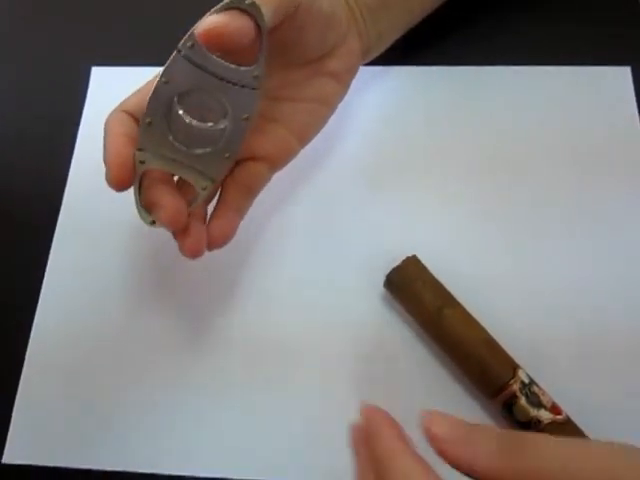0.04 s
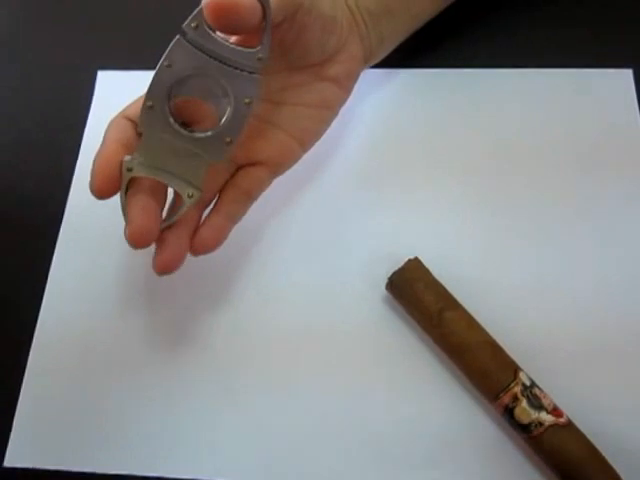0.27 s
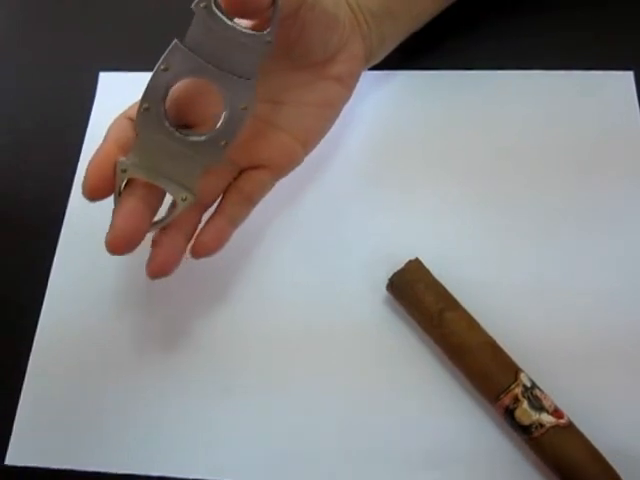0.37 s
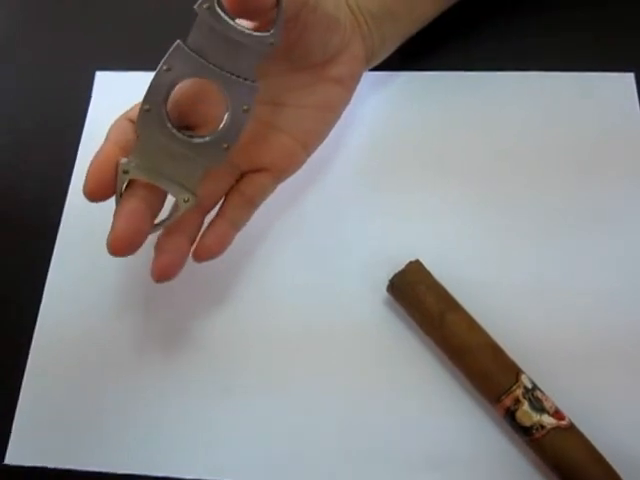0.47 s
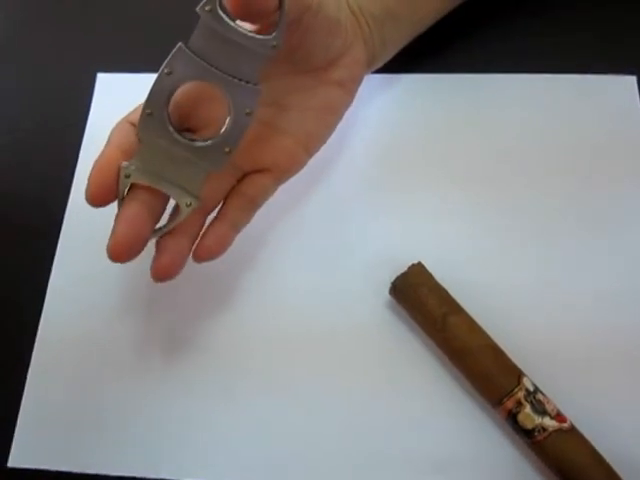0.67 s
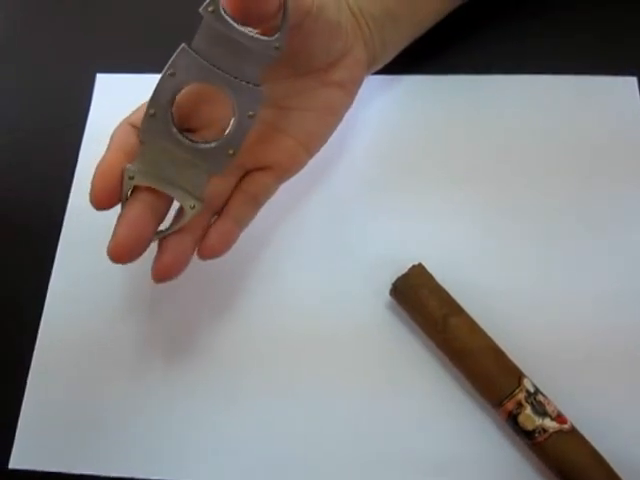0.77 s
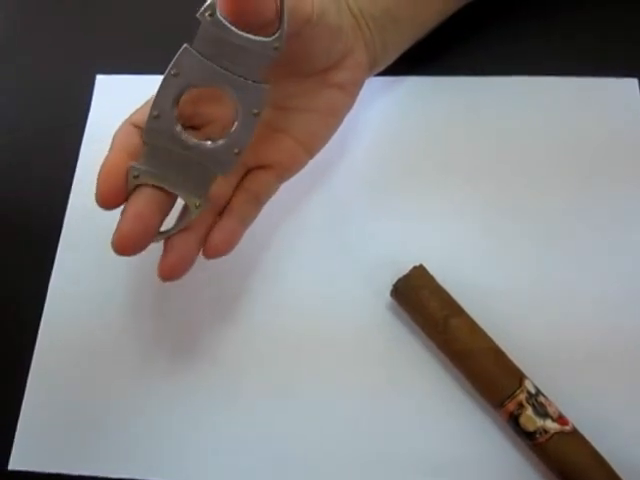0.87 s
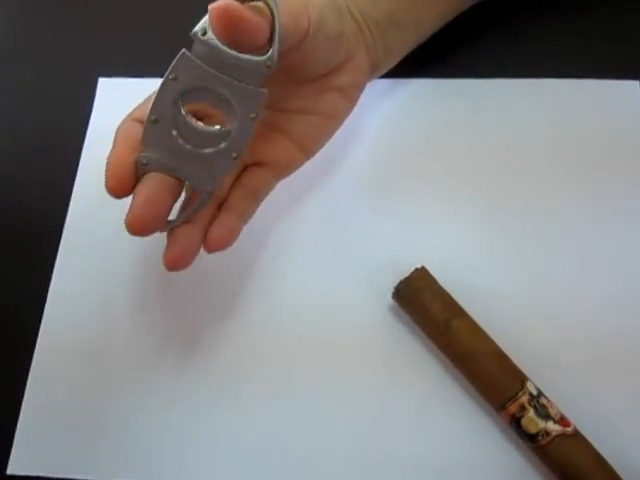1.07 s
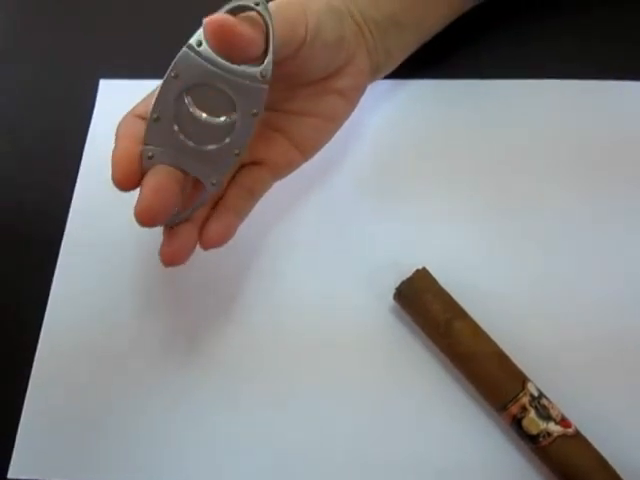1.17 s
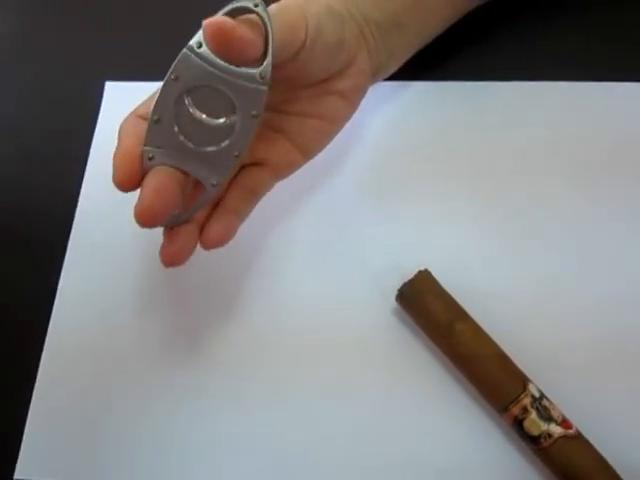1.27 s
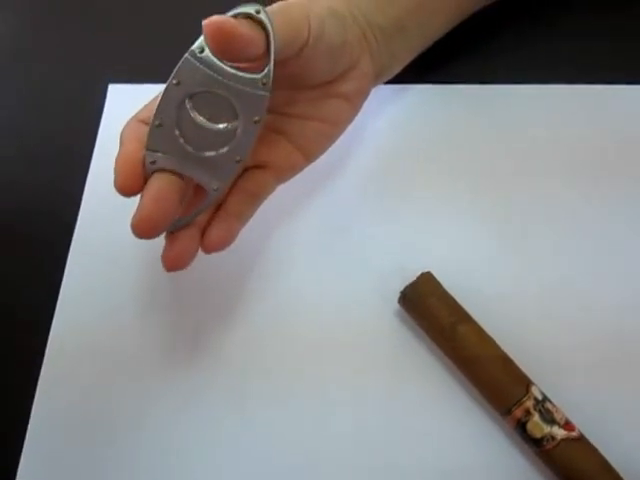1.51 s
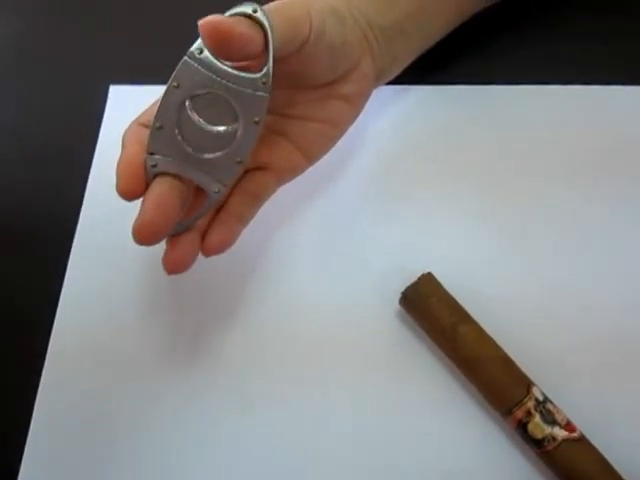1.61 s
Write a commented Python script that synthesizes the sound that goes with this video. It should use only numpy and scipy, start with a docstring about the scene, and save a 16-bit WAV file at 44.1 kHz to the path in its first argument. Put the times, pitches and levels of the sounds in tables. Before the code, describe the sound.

A steel cigar cutter, worked in one hand, opens with two sharp rattling clicks, the second louder. After a short pause its blades scrape softly back and click shut. Heard close up in a quiet room.

```python
"""A stainless steel cigar cutter is worked in one hand in a quiet room. First its two blades slide out and
rattle against their stops, at about 0.25 s and 0.45 s, with soft low thuds among them. From 0.9 s they scrape
back in short slips, and near 1.25 s they click shut. Rumble, hum and hiss lie under it all; an automatic gain
control turns everything down for a moment after a loud click."""
import sys
import numpy as np
from scipy import signal
from scipy.fft import rfft, irfft, next_fast_len
from scipy.io import wavfile
from scipy.ndimage import uniform_filter1d

SR = 44100
rng = np.random.default_rng(int(sys.argv[2]) if len(sys.argv) > 2 else 0)


def wrap_up_sound(samples):
    """Save the sound to the file named by the first command line argument, as 16-bit audio."""
    columns = np.atleast_2d(samples).T
    # keep every value between -1 and 1, then stretch to whole-number steps
    tamed = np.clip(columns, -1, 1)
    steps = np.round(tamed * 32767).astype(np.int16)
    wavfile.write(sys.argv[1], SR, steps)


N = 72765
T = np.arange(N) / SR
RING_WIDTH_HZ = 210   # width of the pitch band that a hit or slip brings out


def clicks(node_width_hz=640, node_db=-13):
    """A blade hits its stop: it chatters, sets the steel ringing and echoes in the room."""
    # One row per hit. The node is a pitch that stays weak, as it barely moves at the spot struck.
    # start_s, level_db, decay_s, low_edge_hz, low_db, mid_db, top_db, ring_hz, ring_db, node_hz, knock_db
    hits = [(0.2244, -19.5, .0022, 2570, -4.5, -2.5, -15, 10120, 13.5, 7600, -28),
            (0.2500, -13, 0.0014, 2480, -7.5, -9, -1.5, 2455, 18.5, 11100, -24.5),
            (0.2516, -8.5, 0.0012, 2430, -19, -13.5, -10, 4300, 12, 10900, -28.5),
            (0.2541, -16.5, 0.0016, 2460, -8, -1.5, -5, 9830, 8.5, 3550, -24),
            (0.4378, -11, 0.001, 2654, -12, 10, -9, 11180, 13.5, 7700, -24.5),
            (0.4541, -11, 0.0012, 2716, -5, -7, -0.5, 3760, 10.5, 9010, -22),
            (0.4549, -17, 0.0013, 2750, -3, 2, -0.5, 11200, 5, 7600, -22.5),
            (0.4575, -15, 0.0036, 2750, 0, 3, -4, 4890, 3, 9000, -22),
            (0.4602, -4, 0.00096, 2700, 3, 4.5, -3.5, 3050, 7, 7600, -21),
            (0.461, -1.5, .0014, 2760, -5.5, -2, -4, 6040, 15.5, 13600, -25),
            (1.2357, -12, 0.0013, 2650, 0.5, 1, -3, 7360, 14.5, 6350, -18.5),
            (1.2368, -16.5, 0.0021, 2350, -7.5, -6, -18, 3390, 7.5, 3950, -22.5),
            (1.2858, -16.5, 0.0013, 2400, 4.5, -0.5, 3.5, 3130, 6.5, 4100, -19.5),
            (1.2870, -10, 0.0009, 2480, -6, -6, -3.5, 5140, 6.5, 4090, -23),
            (1.2878, -11, 0.00084, 2340, -3.5, -12, 3, 14080, 6, 6000, -35)]
    out = np.zeros(N)
    for start_s, level_db, decay_s, low_edge_hz, *colour_db, ring_hz, ring_db, node_hz, knock_db in hits:
        rings = [(ring_hz, RING_WIDTH_HZ, ring_db), (node_hz, node_width_hz, node_db)]
        hit = signal.fftconvolve(chatter(decay_s), steel(low_edge_hz, colour_db, rings, knock_db))
        hit = hit * np.sqrt(decay_s * SR / np.sum(hit ** 2))   # longer chatter carries more energy
        sound = np.pad(hit, (0, N - len(hit))) + room(hit) + blade_ring(ring_hz)
        start = int(start_s * SR)
        out[start:] += from_db(level_db) * sound[:N - start]
    return out


def chatter(decay_s, size=1024, passes=4):
    """One hard contact and a dying buzz of small ones, about equally strong at all pitches."""
    fade = np.exp(-T[:size] / decay_s)
    force = rng.standard_normal(size) * fade
    force[0] = from_db(8.5)   # the first contact stands out
    for _ in range(passes):
        spectrum = rfft(force, 2 * size)
        flattened = irfft(spectrum / (np.abs(spectrum) + 1e-9))[:size]
        force = flattened * fade ** (1 / passes ** 2)
    return force


def steel(low_edge_hz, colour_db, rings, knock_db, size=2048):
    """The cutter's short ring after one contact, coloured by where it is touched; energy 1."""
    # Resonances of the steel, damped by the hand, and the dips between: pitch_hz, width_hz, gain_db
    resonances = [(2880, 580, 2.5), (3640, 260, -3), (4550, 220, 2), (6150, 500, 4), (7350, 700, -2.5),
                  (9900, 250, 4.5), (10470, 320, 7), (11000, 350, 5), (11874, 500, 10.5), (12370, 500, 4.5),
                  (13560, 570, 7.5)]
    # The low, mid and top bands that colour_db turns up or down: pitch_hz, sharpness
    bands = [(2940, 1.4), (6040, 0.79), (14000, 3.5)]
    colour = [(hz, hz / sharpness, db) for (hz, sharpness), db in zip(bands, colour_db)]
    tap = signal.unit_impulse(size)
    knock = from_db(knock_db) * cut(tap, 2300, "low")
    body = cut(tap, low_edge_hz, "high", order=8) + knock
    for pitch_hz, width_hz, gain_db in resonances + colour + rings:
        body = body + (from_db(gain_db) - 1) * resonance(body, pitch_hz, width_hz)
    body = cut(body, 14300, "low", order=4)   # the contact softens the highest pitches
    return body / np.sqrt(np.sum(body ** 2))


def blade_ring(ring_hz, boost_db=19.5):
    """A few faint tones escape the hand's damping and sing on, most of all those near ring_hz."""
    # Lasting tones of the blades: pitch_hz, level_db (relative to the hit), fade_s (to fall 60 dB)
    tones = [(4230, -57, .45), (6100, -70, .42), (9700, -62, 0.46), (10130, -55, .5), (10300, -49, .45),
             (14100, -60, .42)]
    out = np.zeros(N)
    for pitch_hz, level_db, fade_s in tones:
        nearness = np.exp(-((pitch_hz - ring_hz) / RING_WIDTH_HZ) ** 2)
        out += from_db(level_db + boost_db * nearness) * fade_out(fade_s) * sine(pitch_hz)
    return out


def scrapes(edge_s=0.0064, mid_db=3, size=4096):
    """The blades stick and slip in their guides; each slip rubs tiny contacts into the steel."""
    # One row per slip: start_s, length_s, level_db, swell_db, low_db, top_db, ring_hz, ring_db
    slips = [(0.127, 0.042, -56.5, 7.5, 3, -5.5, 11700, 2.5),
             (0.207, 0.037, -36.5, 1.5, -3.5, -1, 6830, 12.5), (0.241, 0.012, -26, 8.5, -5, 2, 13900, 7.5),
             (0.439, 0.0093, -28, -7.5, -12, 1.5, 6100, 2.5),
             (0.449, 0.0099, -20.5, 12, -17.5, 0, 11100, 6.5), (0.891, 0.024, -50, 3, -9, -10, 10150, 7),
             (0.923, 0.022, -53.5, 2.5, -11, -11, 10340, 2), (0.947, 0.0053, -36.5, 5, -9, -13, 3330, 17),
             (0.957, 0.0066, -43, -3, -4.5, -14, 3320, 7.5), (0.983, .018, -44.5, 2, 0, -10.5, 2250, 5.5),
             (1.014, 0.008, -44.5, 4, -4.5, -13.5, 2700, 6),
             (1.022, 0.024, -42.5, -3.5, -3, -12, 2690, 9.5),
             (1.047, 0.017, -39.5, -2.5, -5.5, -13, 2620, 10.5),
             (1.076, 0.012, -49.5, 1, -4.5, -5, 11000, 10.5), (1.105, .016, -39, -1, -2.5, 0, 2300, 5.5),
             (1.15, 0.012, -47, 6.5, 0, 3.5, 4360, 8), (1.161, .011, -37, -4, 0, -10, 4310, 6.5),
             (1.184, .010, -41, 1.5, -4.5, -2, 8550, 13), (1.225, 0.0091, -35, 6, -3, -8.5, 5430, 12.5),
             (1.269, 0.014, -40, 12, 0, -6, 2600, 11)]
    # Pitches that rubbing makes stronger or weaker: pitch_hz, width_hz, gain_db
    rub_colour = [(2630, 290, 5), (3650, 300, -5.5), (9900, 300, 3.5), (10650, 300, 3.5),
                  (12050, 780, -10.5)]
    out, grit, t = np.zeros(N), grains(), T[:size] - edge_s
    for start_s, length_s, level_db, swell_db, low_db, top_db, ring_hz, ring_db in slips:
        soft_edges = np.clip(np.minimum(t, length_s - t) / edge_s + .5, 0, 1)
        progress = np.clip(t / length_s, 0, 1)
        pressure = soft_edges ** 2 * from_db(level_db + swell_db * (progress - .5))
        rings = rub_colour + [(ring_hz, RING_WIDTH_HZ, ring_db)]
        body = steel(low_edge_hz=2196, colour_db=(low_db, mid_db, top_db), rings=rings, knock_db=-20)
        start = int((start_s - edge_s) * SR)
        rub = signal.fftconvolve(grit[start:start + size] * pressure, body)
        gain = np.sqrt(np.sum(pressure ** 2) / (np.sum(rub ** 2) + 1e-20))   # pressure sets loudness
        out[start:start + len(rub)] += gain * rub
    return out


def grains(per_s=7000, spread_db=3.5):
    """Dense tiny contacts of steel on steel, of uneven size; power 1."""
    sizes = from_db(spread_db * np.minimum(rng.exponential(1, N), 4))
    signs = rng.choice([-1, 1], N)
    touching = rng.random(N) < per_s / SR
    return rms_one(sizes * signs * touching)


def low_thuds(swell_s=0.02):
    """Soft, dull low thuds that swell and fade."""
    # One row per thud: peak_s, pitch_hz, level_db
    thuds = [(0.185, 160.5, -49), (0.245, 150, -47), (0.432, 42.1, -46.5)]
    return sum(from_db(level_db) * np.exp(-((T - peak_s) / swell_s) ** 2) * sine(pitch_hz)
               for peak_s, pitch_hz, level_db in thuds)


def room(x, fade_s=0.41, top_fade_s=0.35, split_hz=11500, early_db=-16, early_s=0.016, onset_s=0.0025):
    """Quick echoes from the table, then a wash of room echo whose highest pitches die sooner."""
    # Tone colour of the room's echo: pitch_hz, level_db
    echo_colour = [(1000, -25), (2500, -22), (3300, -21), (4300, -17.5), (5000, -15), (6100, -18),
                   (7500, -16), (9500, -17.5), (10350, -16.5), (11200, -25), (13000, -25), (14200, -19.5),
                   (15500, -19.5)]
    wash = noise(echo_colour)
    low = cut(wash, split_hz, "low", order=4) * fade_out(fade_s)
    high = cut(wash, split_hz, "high", order=4) * fade_out(top_fade_s)
    tail = (low + high) * np.sqrt(2 * np.log(1000) / (fade_s * SR))   # length does not add energy
    early = rng.standard_normal(N) * np.exp(-T / early_s)
    early *= from_db(early_db) * np.sqrt(2 / (early_s * SR))
    echo = (tail + early) * np.clip(T / onset_s, 0, 1)
    return signal.fftconvolve(x, echo)[:N]


def hum(waver_hz=3):
    """A faint hum in the room: each tone is a very narrow band of noise, so it wavers."""
    # Tones of the hum: pitch_hz, level_db
    tones = [(29, -60), (96, -62.5), (176, -60), (262, -61.5)]
    out, hz = np.zeros(N), np.fft.rfftfreq(N, 1 / SR)
    for pitch_hz, level_db in tones:
        band = np.exp(-.5 * ((hz - pitch_hz) / waver_hz) ** 2)
        tone = irfft(rfft(rng.standard_normal(N)) * band, N)
        out += from_db(level_db) * rms_one(tone)
    return out


def rumble(level_db=-47):
    """The room's low rumble, slowly getting quieter."""
    # Tone colour of the rumble: pitch_hz, relative_db
    colour = [(12, -29), (20, -2), (55, 0.5), (79, -10.5), (120, -2), (219, -1), (370, -5.5), (399, -2),
              (627, -13.5), (743, -13.5), (1800, -21.5), (2340, -52.5), (3960, -120)]
    # How its level drifts: time_s, change_db
    drift = [(0, 0), (0.43, 0.5), (0.6, -1.5), (0.9, -2), (1.25, -3.5), (1.65, -4)]
    return drifting_noise(colour, drift, level_db)


def hiss(level_db=-59.5):
    """A faint hiss, slowly getting quieter."""
    # Tone colour of the hiss: pitch_hz, relative_db
    colour = [(1000, -14.5), (2000, 3.5), (4000, -1), (8000, -6), (11000, -7), (13500, -11.5),
              (15500, -17.5), (16000, -34)]
    # How its level drifts: time_s, change_db
    drift = [(0, 1.5), (0.2, 0), (0.5, -2.5), (0.9, -3.5), (1.65, -6)]
    return drifting_noise(colour, drift, level_db)


def gain_control(x, threshold_db=-17.5, squeeze=1.059, attack_s=0.011, release_db_per_s=22.5):
    """Loud peaks pull the volume down; it creeps back up."""
    power = uniform_filter1d(x ** 2, 220)   # averaged over 5 ms
    level_db = 10 * np.log10(np.maximum(power, 1e-12))
    over_db = squeeze * np.maximum(level_db - threshold_db, 0)
    recovery_db = release_db_per_s * T
    held_db = np.maximum.accumulate(over_db + recovery_db, axis=-1) - recovery_db
    smoothing = np.exp(-1 / (attack_s * SR))
    dip_db = signal.lfilter([1 - smoothing], [1, -smoothing], held_db)
    return x * from_db(-dip_db)


def from_db(db):
    """Turn decibels into a factor to multiply by."""
    return 10 ** (np.asarray(db) / 20)


def rms_one(x):
    """Scale a sound so its average power is 1."""
    return x / np.sqrt(np.mean(x ** 2) + 1e-20)


def sine(hz):
    """A pure tone that starts at a random point in its cycle."""
    return np.sin(2 * np.pi * (hz * T + rng.random()))


def fade_out(fade_s):
    """A fade that falls 60 dB in fade_s seconds."""
    return from_db(-60 * T / fade_s)


def cut(x, hz, kind, order=2):
    """Keep the "low" or "high" side of hz; a higher order cuts more steeply."""
    return signal.sosfilt(signal.butter(order, min(hz, .45 * SR), kind, fs=SR, output="sos"), x)


def resonance(x, hz, width_hz):
    """Let one band ring: hz passes at full strength and pitches further away are weakened."""
    r = np.exp(-np.pi * width_hz / SR)
    feedback = [1, -(1 + r * r) * np.cos(2 * np.pi * hz / SR), r * r]
    return signal.lfilter([(1 - r * r) / 2, 0, (r * r - 1) / 2], feedback, x + 1e-18)


def noise(colour):
    """Noise whose tone colour follows (pitch_hz, level_db) points."""
    pitch_hz, level_db = np.transpose(colour)
    size = next_fast_len(N)
    hz = np.maximum(np.fft.rfftfreq(size, 1 / SR), 1)
    gain = from_db(np.interp(np.log(hz), np.log(pitch_hz), level_db))
    return irfft(rfft(rng.standard_normal(size)) * gain, size)[:N]


def drifting_noise(colour, drift, level_db):
    """Coloured noise that strays from level_db along (time_s, change_db) points."""
    change_db = np.interp(T, *np.transpose(drift))
    return from_db(level_db + change_db) * rms_one(noise(colour))


def scene():
    """The cutter heard close up in its room, as one channel."""
    rubbing = scrapes()
    cutter = clicks() + rubbing + room(rubbing)
    return (cutter + low_thuds() + hum() + rumble() + hiss())[None]


def record(dry, ceiling=1.6, cutoff_hz=16700):
    """Apply the gain control, gently round the peaks, then remove the highest treble."""
    rounded = ceiling * np.tanh(gain_control(dry) / ceiling)
    return signal.sosfilt(signal.cheby2(14, 70, cutoff_hz, fs=SR, output="sos"), rounded)


dry = scene()
out = record(dry)
wrap_up_sound(out)
```